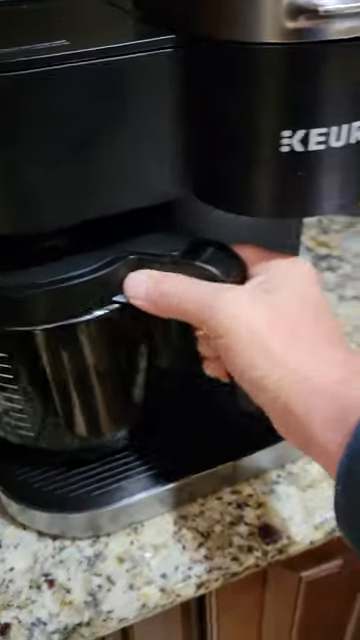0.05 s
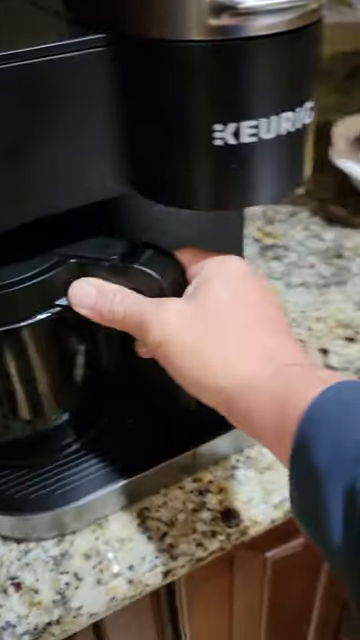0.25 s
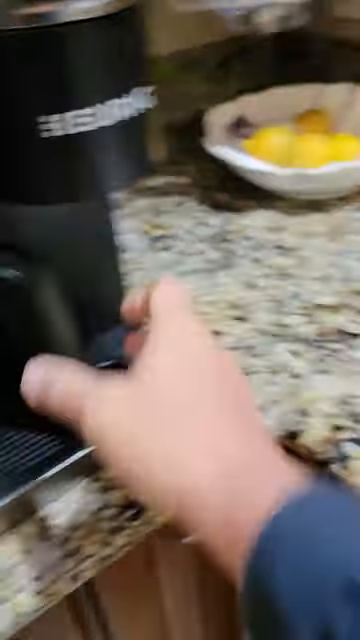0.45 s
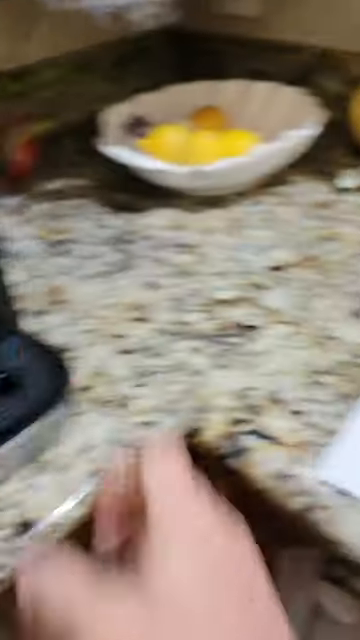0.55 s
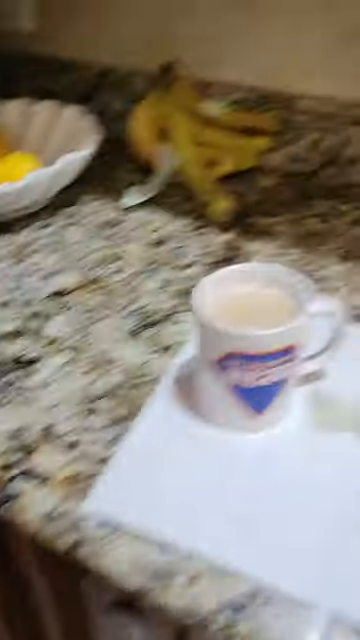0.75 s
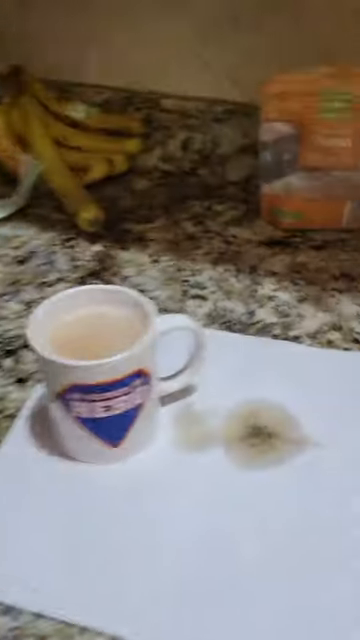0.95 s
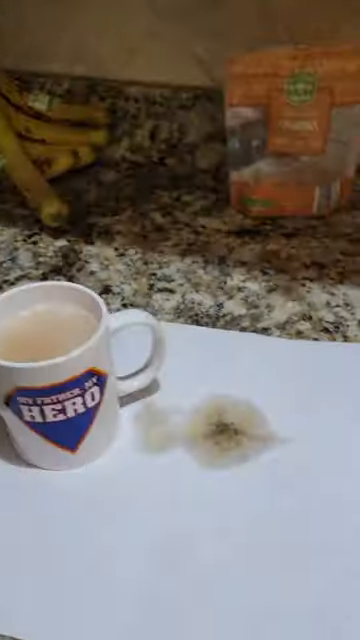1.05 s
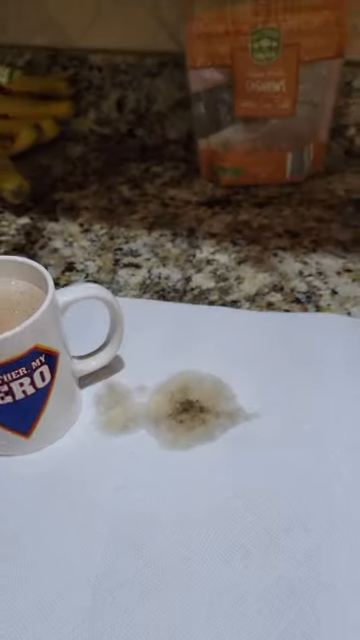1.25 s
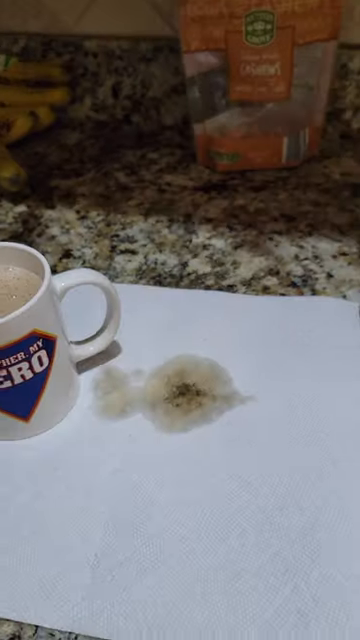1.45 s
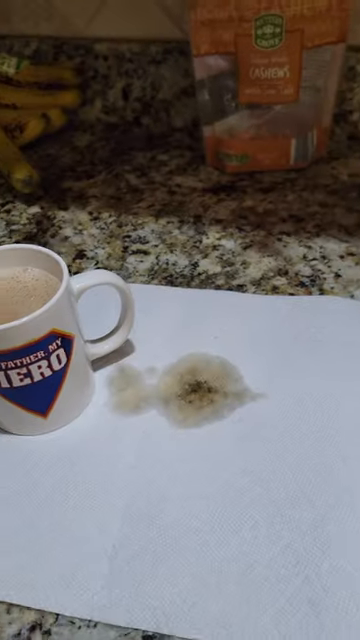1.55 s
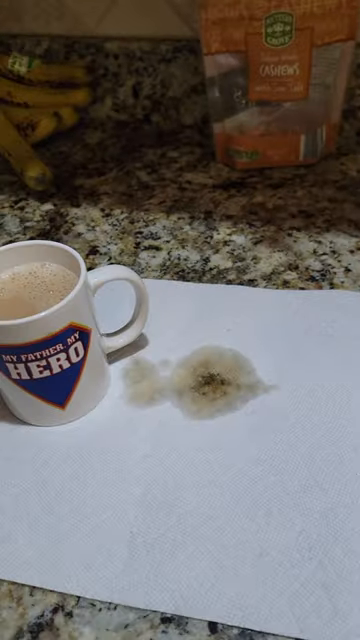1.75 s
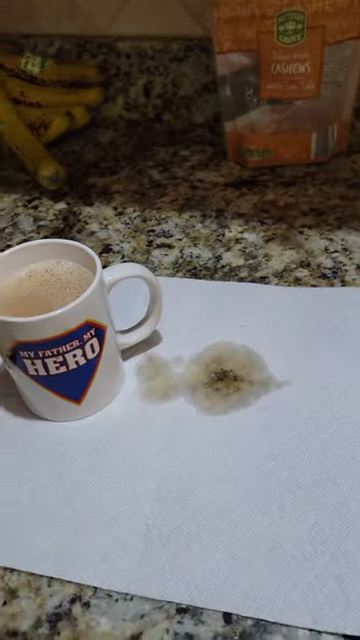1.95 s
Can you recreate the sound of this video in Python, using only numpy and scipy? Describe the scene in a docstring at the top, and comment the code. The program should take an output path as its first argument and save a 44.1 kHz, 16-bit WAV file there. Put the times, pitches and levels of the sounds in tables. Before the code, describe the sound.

A coffee pot clacks home in its machine after a short, bumpy slide, heard close by in a small kitchen. The machine rocks briefly on the counter, then a soft sleeve rustle fades into quiet, even room noise.

```python
"""A small kitchen, with steady room noise. A glass carafe rubs and bumps over the warming plate of a
coffee maker, scrapes the plastic housing and clacks home, each blow exciting their damped modes.
The machine rocks briefly on the counter, and the room answers the carafe with a diffuse tail.
Fingers slip off the handle with a faint squeak, and a sleeve swishes softly as the arm swings away."""
import sys
import numpy as np
from scipy import signal
from scipy.fft import rfft, irfft
from scipy.io import wavfile

SR = 44100
rng = np.random.default_rng(int(sys.argv[2]) if len(sys.argv) > 2 else 0)


def to_wav(sig):
    """Store sig (one row per channel, or 1-D mono) as 16-bit WAV at the path in sys.argv[1].

    Samples outside -1..1 are clipped; the rate is SR.
    """
    pcm = np.clip(np.atleast_2d(sig), -1, 1) * 32767
    pcm = np.round(pcm).astype(np.int16)
    wavfile.write(sys.argv[1], SR, pcm.T)  # frames by channels


N = 88200
T = np.arange(N) / SR
FREQS = np.fft.rfftfreq(N, 1 / SR)
CONTACT_S, CRACK_T60_S, RIGHT_DELAY_S = 0.0015, 0.014, 0.000465
# spectrum of struck or scraped plastic: f/Hz, relative level/dB
PLASTIC_SPECTRUM = [(100, -14.5), (400, 3), (640, 3.5), (830, 13), (1250, 4.5), (1600, -8), (2400, -4.5),
                    (3300, -1), (5000, -10), (7000, -24.5), (9800, -34.5), (12500, -24.5), (16000, -49)]


def amp(db):
    """Amplitude ratio of a level in decibels."""
    return 10 ** (np.asarray(db) / 20)


def read(points, hz):
    """Interpolation of a table on a logarithmic frequency axis."""
    f, value = np.transpose(points)
    return np.interp(np.log(hz + 1), np.log(f + 1), value)


def envelope(points):
    """Amplitude envelope through points of t/s, level/dB."""
    return amp(np.interp(T, *np.transpose(points)))


def pan(left_db):
    """Two gains that set a left-right level difference."""
    return amp(np.array([[.5], [-.5]]) * left_db)


def add(mix, s, sound):
    """Superposition: a sound joins the mix at time s."""
    part = mix[:, max(round(s * SR), 0):][:, :sound.shape[1]]
    part += sound[:, :part.shape[1]]


def waver(count):
    """Band-limited fluctuation through count random values of unit variance."""
    return signal.resample(rng.standard_normal(count), N)


def burst(t60, rise_s):
    """Impact envelope: a quick rise, then exponential decay."""
    return (1 - np.exp(-(T[:SR] / rise_s) ** 2)) * amp(-60 * T[:SR] / t60)


def ring(hz, t60, rise_s):
    """Damped oscillation of one mode, arriving on the left first."""
    t = np.maximum(T[:SR] - np.array([[0], [RIGHT_DELAY_S]]), 0)
    return np.sin(2 * np.pi * hz * t) * amp(-60 * t / t60) * (1 - np.exp(-t / rise_s))


def diffuse_noise(spectrum):
    """Diffuse field at two points: noise of unit RMS, coherent only at long wavelengths."""
    # likeness of the channels: f/Hz, correlation (clipped to 1)
    coherence = [(60, 1.9), (130, 2), (290, 0.54), (640, -0.21), (1410, -0.48), (3100, -0.17), (15000, 0)]
    # balance: f/Hz, left-right level/dB
    sides = [(60, -3), (200, -6.5), (700, -2.5), (2400, -2.5), (4400, -7), (5600, 2), (7000, 10), (8500, 6),
             (12000, -6), (15000, 7)]
    left, independent = rfft(rng.standard_normal((2, N)))
    same = np.clip(read(coherence, FREQS), -1, 1)
    right = same * left + np.sqrt(1 - same ** 2) * independent
    x = irfft(np.array([left, right]) * amp(read(spectrum, FREQS)) * pan(read(sides, FREQS)), N)
    return x / x.std()


def direct_noise(spectrum):
    """Direct field of the machine: noise of unit RMS, its bass coherent and earlier on the left."""
    # likeness of the channels: f/Hz, correlation
    coherence = [(400, 0.98), (1200, 0.73), (3000, -0.15)]
    # balance: f/Hz, left-right level/dB
    sides = [(300, -28), (800, 4), (1500, 0), (3000, 2), (4400, -5), (5600, -1), (7000, 20), (8500, 10),
             (12000, -5), (15000, 5)]
    left, independent = rfft(rng.standard_normal((2, N)))
    same = np.clip(read(coherence, FREQS), -1, 1)
    delay = np.exp(-2j * np.pi * FREQS * RIGHT_DELAY_S)
    right = (same * left + np.sqrt(1 - same ** 2) * independent) * delay
    x = irfft(np.array([left, right]) * amp(read(spectrum, FREQS)) * pan(read(sides, FREQS)), N)
    return x / x.std()


def slide(tick_rise_s=0.00064, bump_tick_db=-7.5):
    """Sliding friction and light impacts: glass rubs and bumps on the plate; handle and fingers tick."""
    # friction spectrum: f/Hz, relative level/dB
    rub_spectrum = [(25, -10), (68, 2), (130, -11), (200, -12), (370, 5), (550, -14), (1000, -18.5),
                    (3000, -31.5), (5000, -30.5), (9000, -61), (16000, -43)]
    # friction envelope: t/s, level/dB
    rub_levels = [(0, -34), (.06, -46.5), (.15, -51), (.2, -47), (.24, -34.5), (.26, -69)]
    # dull bumps: t/s, level/dB, f/Hz, T60/s
    bumps = [(.0005, -23, 367.5, 0.04), (0.0171, -28, 374.5, 0.14), (0.1191, -19.5, 345, 0.047),
             (0.177, -31, 337, 0.065), (0.2158, -25.5, 406, 0.047)]
    # handle and finger ticks: t/s, level/dB, f/Hz, T60/s
    ticks = [(.0525, -41, 2850, .04), (.1185, -49, 3600, .035), (.1185, -42, 1100, .03),
             (1.696, -68, 13000, .03), (1.718, -68, 14000, .03)]
    out = diffuse_noise(rub_spectrum) * envelope(rub_levels)
    tick = amp(bump_tick_db) * burst(CRACK_T60_S, tick_rise_s)
    grit = diffuse_noise(rub_spectrum)
    for (s, db, hz, t60), at in zip(bumps, rng.integers(0, N - SR, len(bumps))):
        add(out, s, amp(db) * (ring(hz, t60, rise_s=0.0019) + tick * grit[:, at:at + SR]))
    for s, db, hz, t60 in ticks:
        click = diffuse_noise([(hz / 2, -16), (hz * .85, -10), (hz, 0), (hz * 1.2, -14), (hz * 3, -46)])
        add(out, s, amp(db) * burst(t60, tick_rise_s) * click[:, :SR])
    return out


def rocking():
    """Free vibration: the whole machine booms and shudders on its feet in two low modes."""
    # jolts: t/s, boom level/dB, shudder level/dB
    jolts = [(.0, -24.5, -64), (0.091, -34.5, -61), (0.2548, -38, -11), (0.269, -17, -44),
             (0.345, -21, -57), (0.4428, -34, -54)]
    boom = ring(hz=70, t60=0.18, rise_s=0.011)
    shudder = ring(hz=102, t60=0.064, rise_s=0.011)
    out = np.zeros((2, N))
    for s, boom_db, shudder_db in jolts:
        add(out, s, amp(boom_db) * boom + amp(shudder_db) * shudder)
    return out


def room_noise(level_db=-46.5, waver_db=.5):
    """Ambient noise: a diffuse field of nearly constant level."""
    # background spectrum: f/Hz, relative level/dB
    spectrum = [(20, -17.5), (60, -1.5), (100, -4.5), (165, -10), (220, 3), (330, -4.5), (520, -1),
                (800, 3), (1100, -3), (1500, -9), (3000, -18), (5000, -32), (7000, -37.5), (9500, -49),
                (12500, -45.5), (16000, -55)]
    return diffuse_noise(spectrum) * amp(level_db + waver_db * waver(count=40))


def kitchen(x, gain_db=-18, gap_s=.006):
    """Reverberation: convolution with a diffuse tail in which the bass lasts longest."""
    # reverberation times: f/Hz, T60/s
    decay_times = [(100, 0.59), (400, 0.61), (1200, 0.26), (4000, 0.41), (12000, 0.2)]
    white = diffuse_noise([(20, 0), (20000, 0)])[:, :SR]
    hz, t, bands = signal.stft(white, SR, nperseg=256)
    decay = amp(-60 * t / read(decay_times, hz)[:, None])
    _, tail = signal.istft(bands * decay, SR, nperseg=256)
    wet = np.zeros((2, N))
    add(wet, gap_s, signal.fftconvolve(x[:1], tail / np.linalg.norm(tail[0]), axes=1))
    return amp(gain_db) * wet


def scrape(peak_s=.249, peak_db=-26.5, swell_s=0.0072):
    """Friction noise swells as the rim rides up to its seat and stops at the first full blow."""
    swell = np.exp(np.minimum(T - peak_s, 0) / swell_s - np.maximum(T - peak_s, 0) / CONTACT_S)
    return amp(peak_db) * swell * direct_noise(PLASTIC_SPECTRUM)


def clacks(thud_gain_db=4.5, crack_gain_db=-15.5, rattle_db=-4, rise_s=0.00027):
    """Impact excitation: each blow rings the modes and adds a thud and a crack with a short rattle."""
    # carafe against housing: t/s, then gain/dB of ring, thud, crack and the crack's treble
    blows = [(0.245, -29, -19, -11, 7), (0.2483, -1, -24, 0.5, -5.5), (0.25, -10.5, -3, -0.5, -11),
             (0.2577, -10, -7.5, -20, 7), (0.2726, 5, -13, 0, -6), (.2750, 1, -6.5, -2, 0),
             (.2842, -9, -20, -8, 2), (0.2901, -2, -2, -2, -6.5), (0.296, -39, -44, -11, -11),
             (0.3282, -39, -37, -37, -4)]
    # modes of carafe and housing: f/Hz, level/dB, T60/s, left-right level/dB
    modes = [(216, -28, 0.18, 1), (260, -20, 0.14, -12), (289.6, -26, 0.19, -3.5), (392, -27, 0.068, 2),
             (439.1, -30, 0.32, -3), (467, -14, .04, -0.5), (533, -22, 0.089, -3.5), (750, -20, 0.081, -2),
             (835.5, -19.5, 0.052, 8.5), (1210, -35, 0.23, -3.5), (2062, -26, 0.036, -1),
             (3070, -31.5, .06, -5), (3680, -30, .07, 2), (4730, -34, .065, -4)]
    body = sum(amp(db) * pan(side) * ring(hz, t60, CONTACT_S) for hz, db, t60, side in modes)
    thud = amp(thud_gain_db) * ring(hz=353, t60=0.011, rise_s=0.0012)
    hit = burst(CRACK_T60_S, rise_s)
    dull_fade = hit + amp(rattle_db) * burst(t60=0.1, rise_s=rise_s)
    treble_fade = hit + amp(rattle_db) * burst(t60=0.089, rise_s=rise_s)
    grit = direct_noise(PLASTIC_SPECTRUM)
    dull = signal.sosfiltfilt(signal.butter(2, 5550, fs=SR, output="sos"), grit)
    treble = grit - dull
    out = np.zeros((2, N))
    for (s, ring_db, thud_db, crack_db, treble_db), at in zip(blows, rng.integers(0, N - SR, len(blows))):
        crack = dull_fade * dull[:, at:at + SR] + amp(treble_db) * treble_fade * treble[:, at:at + SR]
        add(out, s, amp(ring_db) * body + amp(thud_db) * thud + amp(crack_gain_db + crack_db) * crack)
    # the housing radiates little bass
    return signal.sosfilt(signal.butter(2, 171, "highpass", fs=SR, output="sos"), out)


def sleeve(grain_db=0.63, swish_left_db=-1, swish_width_hz=1180):
    """Cloth friction: an uneven hiss and a rising band of noise swell as the arm moves."""
    # broad hiss: f/Hz, relative level/dB
    hiss_spectrum = [(200, 9), (1000, -0.5), (2000, 3.5), (3400, 2), (4900, 2), (6000, -12), (7200, -18.5),
                     (9700, -33), (12500, -18), (16000, -27)]
    # its envelope: t/s, level/dB
    hiss_levels = [(.25, -61.5), (.42, -51), (.55, -50.5), (.72, -49.5), (.87, -50.5), (.95, -57.5),
                   (1.1, -56.5), (1.42, -57.5), (1.65, -59), (1.85, -61)]
    # rising band: t/s, centre f/Hz, level/dB
    swish_path = [(.35, 3050, -69), (.5, 3360, -53), (.59, 3500, -58), (.65, 4330, -56), (.87, 4770, -61.5),
                  (.96, 5140, -66.5), (1.15, 6070, -70.5), (1.42, 6470, -68.5), (1.62, 6370, -74.5),
                  (1.8, 6200, -84)]
    # fine fizz: f/Hz, relative level/dB
    fizz_spectrum = [(8000, -36), (10800, -10), (12500, 1), (15500, -11)]
    # its envelope: t/s, level/dB
    fizz_levels = [(.4, -90), (.75, -79), (1.0, -78.5), (1.42, -75), (1.75, -92)]
    s, hz, db = np.transpose(swish_path)
    carrier = np.exp(2j * np.pi * np.cumsum(np.interp(T, s, hz)) / SR)
    lowpass = signal.butter(2, swish_width_hz / 2, fs=SR, output="sos")
    # shifting down, filtering and shifting back makes a moving band-pass
    band = (carrier * signal.sosfilt(lowpass, rng.standard_normal((2, N)) / carrier)).real
    swish = amp(np.interp(T, s, db)) * pan(swish_left_db) * band / band.std()
    hiss = diffuse_noise(hiss_spectrum) * envelope(hiss_levels)
    fizz = diffuse_noise(fizz_spectrum) * envelope(fizz_levels)
    return (hiss + swish + fizz) * amp(grain_db * waver(count=200))


def snap(at_s=.2729, level_db=-11.5):
    """A brief contact has a broad spectrum: the hard rim hits home with one bright snap."""
    # rim impact: f/Hz, relative level/dB
    spectrum = [(200, -17), (1000, 14), (2100, 5.5), (3500, 8), (5500, 2), (7000, -11.5), (9800, -18.5),
                (14000, -16)]
    out = np.zeros((2, N))
    add(out, at_s, amp(level_db) * burst(t60=.011, rise_s=.0004) * direct_noise(spectrum)[:, :SR])
    return out


def squeak(level_db=-80, waver_hz=160):
    """A friction tone, thin and very high, wavers as the fingers slip off the handle."""
    # pitch contour: t/s, f/Hz
    contour = [(.46, 13000), (.485, 15000), (.54, 15400), (.595, 13800), (0.621, 15600)]
    s, hz = np.transpose(contour)
    pitch = np.interp(T, s, hz) + waver_hz * waver(count=400)
    fade = np.interp(T, s, [0, 1, 1, 1, 0])
    return amp(level_db) * fade * np.sin(2 * np.pi * np.cumsum(pitch) / SR)


def scene():
    """Superposition of all sources; only the carafe's sounds reverberate."""
    carafe = clacks() + snap() + scrape() + slide()
    return carafe + kitchen(carafe) + rocking() + squeak() + sleeve() + room_noise()


def record(dry):
    """Band limiting: a linear-phase low-pass at 15.8 kHz."""
    lowpass = signal.firwin(511, 15800, window=("kaiser", 9), fs=SR)
    return signal.oaconvolve(dry, lowpass[None], "same")


dry = scene()
out = record(dry)
to_wav(out)
```